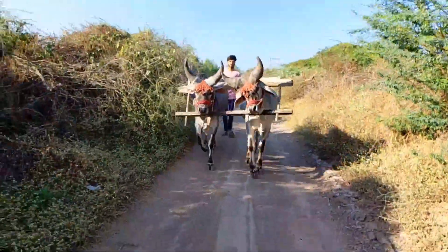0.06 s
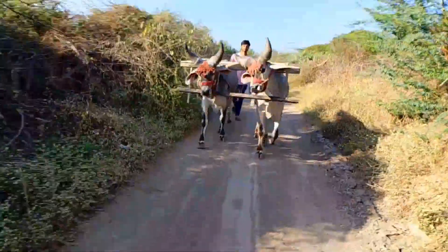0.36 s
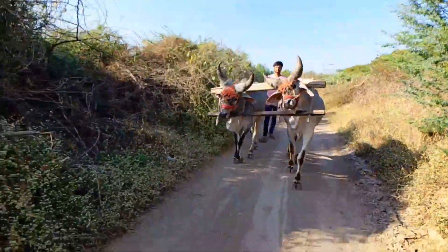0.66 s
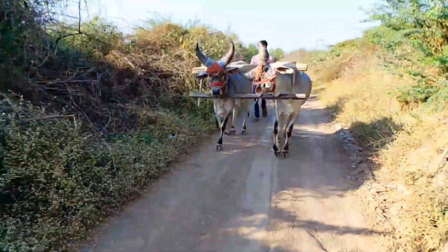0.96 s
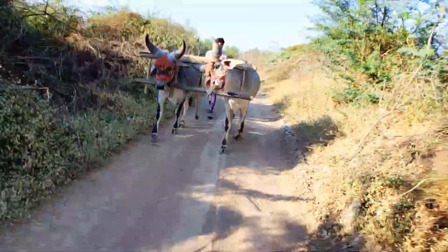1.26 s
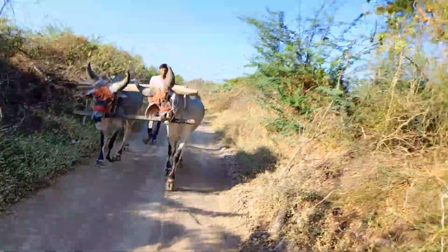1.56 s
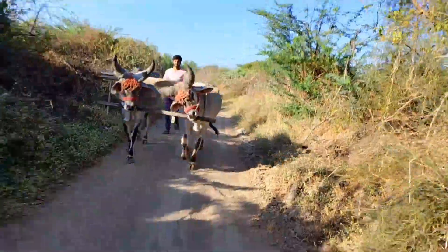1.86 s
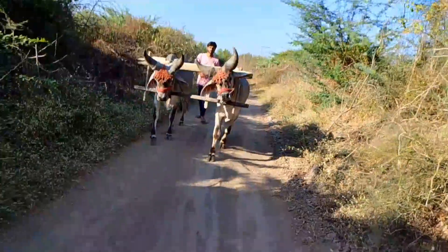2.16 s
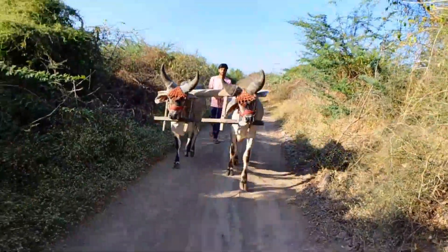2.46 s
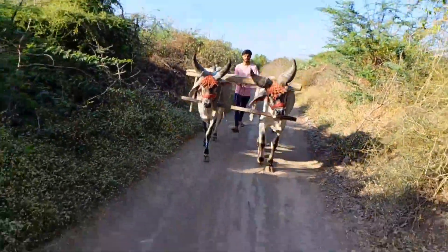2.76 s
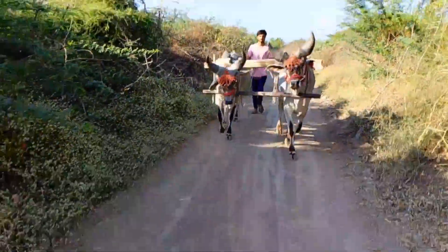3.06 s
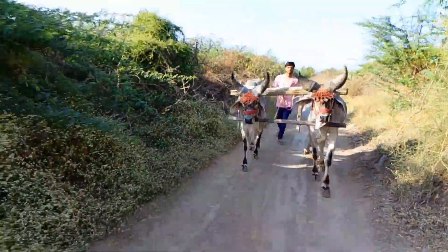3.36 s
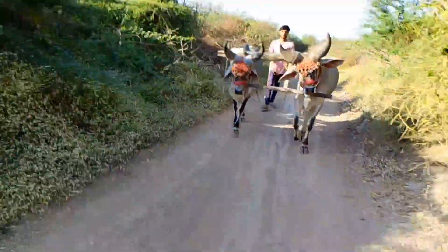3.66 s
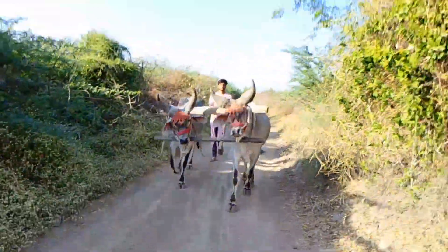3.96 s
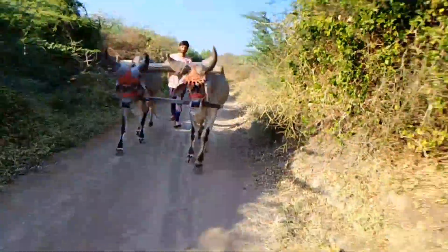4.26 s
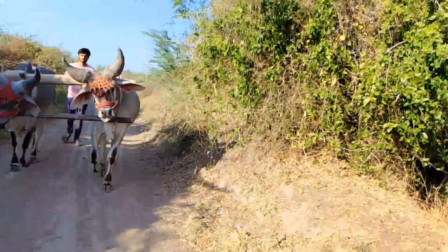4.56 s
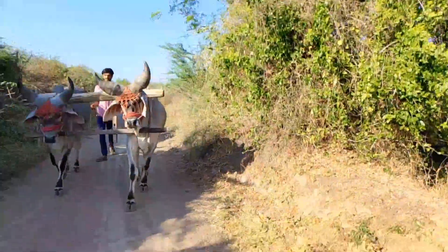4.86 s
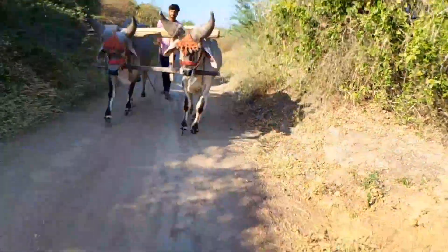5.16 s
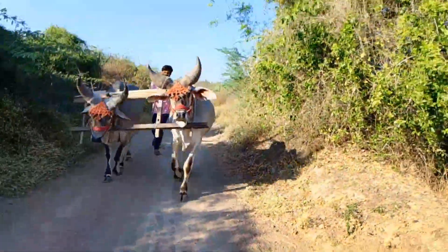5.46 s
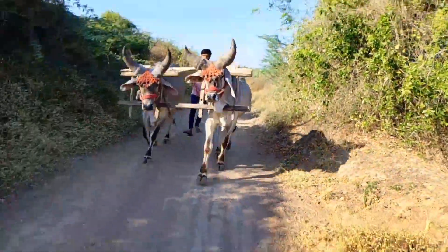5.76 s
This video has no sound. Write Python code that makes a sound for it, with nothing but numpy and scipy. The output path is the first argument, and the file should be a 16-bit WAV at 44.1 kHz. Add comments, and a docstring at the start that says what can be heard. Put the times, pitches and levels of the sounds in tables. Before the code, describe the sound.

Uneven hoof steps crunch and scuff on gritty soil, with small stone cracks, light knocks and a soft outdoor hiss.

```python
"""Two yoked bullocks and their driver on a gravelly dirt track, a few paces in front of the microphone.
From the start a smooth hiss comes and goes over a faint outdoor floor, and light air rumbles on the mic.
Each footfall pushes soil, grinds grit and sprays sand; pebbles tick, stones snap, hoof or yoke knocks.
Near 1.7 s a gust meets the sharpest snap; at 3.5 s several stones give way in a cluster.
The hiss is strongest around 4 s, and the walk goes on in lighter scuffs to the end."""
import sys
import numpy as np
from scipy import signal
from scipy.fft import rfft, irfft
from scipy.io import wavfile

SR = 44100
rng = np.random.default_rng(int(sys.argv[2]) if len(sys.argv) > 2 else 0)


def log_audio(samples):
    """Write samples as a 16-bit WAV file to the path given in sys.argv[1]."""
    # one column per channel
    frames = np.atleast_2d(samples).T
    # limit to full scale, then quantise
    limited = np.clip(frames, -1, 1)
    pcm = np.round(limited * 32767).astype(np.int16)
    wavfile.write(sys.argv[1], SR, pcm)


N = 259749
TIME = np.arange(N) / SR

# swells of the smooth hiss: (start [s], hold [s], level [dB])
HISS_SWELLS = [(0.0, 0.071, -51.5), (1.372, 0.064, -42.5), (2.507, 0.044, -50), (2.841, 0.093, -43.5),
               (3.317, 0.25, -42), (3.781, 0.348, -39)]
# gusts on the microphone: (time [s], level [dB])
GUSTS = [(.32, -64), (1.73, -51.5)]
# a foot drags; sandiness is dull soil below 0, bright sand above:
# (time of hardest push [s], level [dB], swell time [s], sandiness [dB])
SCUFFS = [(0.16, -49, 0.11, 2.5), (0.333, -42, 0.03, 2), (0.59, -52, 0.041, -2), (0.767, -43.5, 0.036, 8),
          (0.809, -39, 0.032, 3.5), (1.216, -49, 0.031, 5.5), (1.264, -47, 0.013, 0.5),
          (1.507, -37.5, 0.016, -3.5), (1.535, -31, .018, 0), (1.729, -45.5, 0.046, 1.5),
          (1.922, -49, 0.057, 1), (2.224, -46.5, 0.018, 4.5), (2.422, -49.5, 0.024, 3.5),
          (2.658, -46.5, 0.043, -0.5), (3.17, -47.5, 0.06, -0.5), (4.5, -54, 0.21, -1),
          (4.68, -46, 0.037, 3.5), (4.756, -48, 0.019, 0.5), (5.02, -53.5, 0.1, 3), (5.098, -41, 0.012, -2),
          (5.208, -51.5, 0.097, 0), (5.462, -51.5, .02, 4), (5.589, -49, .02, -1), (5.693, -47.5, .03, 2),
          (5.784, -50, 0.02, 0)]
# a foot comes down and settles: (time [s], level [dB], settling time [s], sandiness [dB])
LANDINGS = [(0.256, -46, 0.032, 4), (0.524, -43, 0.013, -1.5), (0.987, -53, 0.037, -6),
            (1.103, -40, 0.0045, 3.5), (1.19, -38, 0.024, -1.5), (1.49, -42.5, .015, -0.5),
            (1.649, -41.5, .04, 1.5), (1.768, -44, 0.021, 8), (2.004, -50.5, 0.017, 6.5),
            (2.108, -47, 0.047, 4), (2.139, -41, 0.0075, -10.5), (2.898, -45, 0.018, -1),
            (3.338, -49.5, 0.051, -3.5), (3.524, -41.5, 0.023, 1.5), (3.575, -43, 0.059, 2),
            (3.656, -46.5, .014, 8.5), (3.792, -47.5, 0.0073, -10), (4.099, -44, 0.0091, -8.5),
            (4.121, -40, 0.0055, 1), (4.251, -49.5, 0.026, 1.5), (4.824, -47, 0.053, -0.5),
            (5.33, -48, 0.033, -6), (5.841, -53, 0.052, -1)]
# the loudest stones snapping under a hoof: (time [s], peak [dB], centre [Hz], half width [octaves])
STONE_SNAPS = [(0.104, -25, 3680, 0.5), (0.1858, -20, 7050, 0.67), (0.297, -15, 4830, 0.44),
               (0.316, -18.5, 3960, 0.27), (0.3289, -15.5, 2750, 1.06), (0.4515, -30.5, 3080, 0.7),
               (0.522, -33, 1780, 1.2), (0.5948, -18, 6750, 0.84), (0.8142, -19, 4230, 0.4),
               (1.138, -23.5, 2280, 0.58), (1.1908, -24, 2500, 0.68), (1.222, -19, 2460, 1.3),
               (1.636, -16.5, 4640, 1.2), (1.651, -17.5, 2550, 0.86), (1.6751, -15.5, 2880, 0.94),
               (1.7662, -10.5, 6540, 0.97), (2.137, -22.5, 2880, 0.94), (2.3021, -28.5, 2680, 0.55),
               (2.356, -22, 4470, 1.34), (2.735, -22.5, 2200, 2.5), (2.7593, -28.5, 2670, 0.75),
               (3.107, -27, 2820, 0.42), (3.1358, -32.5, 1470, 0.46), (3.157, -23, 2270, 2.2),
               (3.5321, -11, 3600, .65), (3.5447, -13, 4270, 0.75), (3.5652, -12.5, 2700, 0.83),
               (3.5737, -12.5, 3200, 1.7), (3.5833, -21, 2800, 0.76), (3.6614, -20.5, 5350, 0.34),
               (3.6922, -22, 3120, 0.31), (3.719, -24, 4100, 1), (4.097, -21.5, 1510, 1.1),
               (4.382, -27, 6600, 0.41), (4.4962, -25.5, 6300, 0.18), (4.544, -34, 2280, 1.3),
               (4.5634, -23, 5400, 0.56), (4.723, -24.5, 2620, .4), (4.889, -24.5, 4750, 0.86),
               (4.958, -27.5, 5550, 0.43), (5.1789, -16, 5400, 1.4), (5.2511, -28.5, 1760, 0.88),
               (5.8463, -26, 3900, 0.78)]
# hollow knocks of hoof or yoke: (time [s], relative level [dB], pitch [Hz], t60 [s])
KNOCKS = [(.223, -46, 700, 0.023), (0.254, -38.5, 595, 0.014), (0.331, -40.5, 1675, 0.091),
          (1.156, -44, 692, 0.034), (1.53, -42, 515, 0.047), (1.93, -49.5, 920, 0.032),
          (2.106, -44, 700, 0.023), (4.096, -43, 1340, 0.016), (4.681, -38.5, 1280, 0.014),
          (5.094, -40, 1054, 0.021), (5.31, -46.5, 768, 0.1), (5.665, -50, 2200, 0.027)]
# modes of a knock: (frequency [x pitch], level [dB], decay time [x t60])
KNOCK_MODES = [(0.6, -5, 1.25), (1, 9.5, 0.75), (1.35, -27, 0.74), (1.9, -2.5, 1), (3.5, 0.5, 0.36)]
# spectra of the hiss, the air on the microphone and the ground: (frequency [Hz], density [dB])
HISS_SPECTRUM = [(100, -10.5), (400, -7), (1000, -7.5), (2100, -7.5), (3200, 2), (4200, -3), (6300, -7.5),
                 (7200, 5), (10000, -0.5), (14000, 3)]
RUMBLE_SPECTRUM = [(10, -7), (30, -4), (70, -5), (150, -11), (350, -15), (1000, -21.5), (8000, -91)]
SOIL_SPECTRUM = [(50, -35), (150, -4.5), (270, -7.5), (370, -6.5), (490, -2.5), (720, -1), (1100, -3.5),
                 (1800, -12), (4000, -20), (16000, -20)]
GRIT_SPECTRUM = [(100, -27), (700, -8.5), (1600, 2), (2600, 2.5), (4500, 1.5), (8000, -8), (16000, -46.5)]
SAND_SPECTRUM = [(100, -12.5), (1700, -18.5), (3300, 6.5), (5000, -2), (8000, 1.5), (16000, -2.5)]
# colour of the microphone: (frequency [Hz], gain [dB])
MIC_RESPONSE = [(20, 9), (1500, 1.5), (2800, 2), (3900, -6.5), (4900, -3.5), (6300, -6.5), (7300, -3),
                (8100, 2), (9300, -4.5), (11000, -10.5), (12500, -20.5), (16000, -26)]


def from_db(db):
    """Decibels to gain."""
    return 10 ** (np.asarray(db) / 20)


def rms_one(x):
    """Scale to an rms of one."""
    return x / np.sqrt(np.mean(x ** 2) + 1e-20)


def colour(x, spectrum, size=8192):
    """Causal (minimum-phase) filter that follows a table of (frequency [Hz], gain [dB])."""
    hz, db = np.transpose(spectrum)
    grid = np.maximum(np.fft.rfftfreq(size, 1 / SR), 1)
    gain = from_db(np.interp(np.log(grid), np.log(hz), db))
    cepstrum = irfft(np.log(gain))
    cepstrum[1:size // 2] *= 2
    response = irfft(np.exp(rfft(cepstrum[:size // 2], size)))
    return signal.fftconvolve(x, response)[:N]


def band(x, low_hz, high_hz, order=1):
    """Band-pass."""
    edges = [low_hz, min(high_hz, .45 * SR)]
    return signal.sosfilt(signal.butter(order, edges, "band", fs=SR, output="sos"), x + 1e-18)


def add(track, s, sound):
    """Mix a short sound into the track at time s."""
    start = max(round(s * SR), 0)
    track[start:start + len(sound)] += sound[:N - start]


def swell(start, hold_s, attack_s, release_s):
    """Envelope that grows to one at start, holds and dies away."""
    return np.exp(-np.maximum((start - TIME) / attack_s, (TIME - start - hold_s) / release_s).clip(0, 20))


def flicker(per_s, depth_db, hop=40):
    """Gain that wanders at random, about per_s times a second."""
    pole = np.exp(-2 * np.pi * hop * per_s / SR)
    noise = rng.standard_normal(N // hop + 1002)
    slow = signal.lfilter([1], [1, -2 * pole, pole * pole], noise)[1000:]
    slow = np.interp(np.arange(N) / hop, np.arange(len(slow)), rms_one(slow))
    return from_db(depth_db * slow.clip(-2, 2))


def hiss(rest_db=-49, fade_db_per_s=1.93):
    """A smooth hiss swells a few times above a slowly sinking bed."""
    rest = from_db(rest_db - fade_db_per_s * TIME)
    swell_power = sum((from_db(db) * swell(s, hold_s, attack_s=0.048, release_s=0.028)) ** 2
                      for s, hold_s, db in HISS_SWELLS)
    strength = np.sqrt(rest ** 2 + swell_power) * flicker(per_s=46, depth_db=0.76)
    return strength * rms_one(colour(rng.standard_normal(N), HISS_SPECTRUM))


def breeze(steady_db=-68.5, gust_s=0.039):
    """Light air rumbles on the microphone, with brief gusts."""
    gust_power = sum((from_db(db) * swell(s, 0, gust_s, gust_s)) ** 2 for s, db in GUSTS)
    rumble = flicker(per_s=27, depth_db=3.5) * colour(rng.standard_normal(N), RUMBLE_SPECTRUM)
    return np.sqrt(from_db(steady_db) ** 2 + gust_power) * rms_one(rumble)


def foot_pressures(soil_db=-7.5, sand_db=3, usual_step_db=-45, crush_db_per_db=0.2759):
    """Landings bite and settle, scuffs swell and fade; each is shared among soil, grit and sand."""
    steps = [(db, sandy, swell(s, 0, 0.15 * settle_s, settle_s)) for s, db, settle_s, sandy in LANDINGS]
    steps += [(db, sandy, swell(s, 0, swell_s, 0.99 * swell_s)) for s, db, swell_s, sandy in SCUFFS]
    power = np.zeros((3, N))
    for db, sandy, push in steps:
        grit_db = crush_db_per_db * (db - usual_step_db)  # heavy steps crush disproportionately more
        shares_db = np.array([soil_db - sandy, grit_db, sand_db + sandy])
        power += np.outer(from_db(db + shares_db), push) ** 2
    return np.sqrt(power)


def grains(pressure, spectrum, per_s, spread_db, smooth, clump_db):
    """Tiny uneven fractures over smooth rubbing; a harder push breaks more grains per second."""
    out, edges = 0, np.geomspace(70, 18000, 13)
    chance = (per_s * np.sqrt(pressure / pressure.mean()) + 50) / SR
    for low, high in zip(edges, edges[1:]):
        at = np.flatnonzero(rng.random(N) < chance)
        sizes = from_db(spread_db * np.minimum(rng.exponential(1, N)[at], 3))
        clicks = np.zeros(N)
        rubbing = rng.standard_normal(N)
        # the same energy is shared among more grains when they come faster
        clicks[at] = sizes * np.sign(rubbing[at]) / np.sqrt(chance[at])
        clumps = flicker(per_s=35.3, depth_db=clump_db)  # each pitch range crumbles in its own clumps
        out = out + band((rms_one(clicks) + smooth * rubbing) * clumps, low, high, order=2)
    return pressure * rms_one(colour(rms_one(out), spectrum))


def footfalls(soil, grit, sand):
    """A dull push of soil, crunching grit and a spray of sand; the foot sticks and slips as it grinds."""
    push = grains(soil, SOIL_SPECTRUM, per_s=500, spread_db=4.5, smooth=0.4, clump_db=3.5)
    crunch = grains(grit, GRIT_SPECTRUM, per_s=500, spread_db=7.5, smooth=1.0, clump_db=8.5)
    spray = grains(sand, SAND_SPECTRUM, per_s=1000, spread_db=8.5, smooth=0.95, clump_db=3.5)
    return (push + crunch + spray) * flicker(per_s=45, depth_db=1.2)


def loose_gravel(pressure, per_s=75, size_db=-45, spread_db=4.5, pitches=12):
    """Small pebbles roll and tick at different pitches, oftener and louder while a foot works the ground."""
    out, t = np.zeros(N), TIME[:SR // 100]
    stir = np.sqrt(pressure) / np.mean(np.sqrt(pressure))
    for hz in np.geomspace(2100, 8500, pitches):
        at = np.flatnonzero(rng.random(N) < per_s * stir / (pitches * SR))
        sizes = stir[at] * from_db(size_db + spread_db * np.minimum(rng.exponential(1, N)[at], 2.5))
        tick = band(rng.standard_normal(len(t)) * np.exp(-t / .001), hz / 1.4, hz * 1.4, order=2)
        for s, size in zip(TIME[at], sizes):
            add(out, s, size * tick / np.abs(tick).max())
    return out


def stone_snaps(crumble=0.14, crumble_s=0.0026):
    """A stone gives way with one snap and a moment of crumbling, both in its own pitch range."""
    out, t = np.zeros(N), TIME[:SR // 40]
    for s, peak_db, hz, octaves in STONE_SNAPS:
        force = crumble * rng.standard_normal(len(t)) * np.exp(-t / crumble_s)
        force[0] += 2  # the break itself
        snap = band(force, hz / 2 ** octaves, hz * 2 ** octaves, order=2)
        add(out, s, from_db(peak_db) * snap / np.abs(snap).max())
    return out


def knocks(contact_s=0.00035, grind=0.029, grind_s=0.0085):
    """Blunt blows of hoof or yoke, roughened by grit in the contact, set a few damped modes ringing."""
    out, t = np.zeros(N), TIME[:SR // 4]
    for s, db, hz, t60 in KNOCKS:
        ring = np.zeros(len(t))
        for ratio, mode_db, share in KNOCK_MODES:
            decay = np.exp(-np.log(1000) * t / (t60 * share))
            ring += from_db(mode_db) * decay * np.sin(2 * np.pi * hz * ratio * t)
        force = grind * rng.standard_normal(len(t)) * np.exp(-t / grind_s)
        force[0] += 1  # the blow itself
        rough = signal.fftconvolve(force, ring)[:len(t)] * (1 - np.exp(-t / contact_s))
        add(out, s, from_db(db) * ring.std() * rms_one(rough))
    return out


def banks(x, t60=0.1, build_s=0.00094, scatter_db=-15):
    """The overgrown banks of the track scatter a short, faint, broadband tail back to the microphone."""
    t = TIME[:SR // 3]
    envelope = np.exp(-np.log(1000) * t / t60) * (1 - np.exp(-t / build_s))
    tail = band(rng.standard_normal(len(t)), 134, 13500) * envelope
    return from_db(scatter_db) * signal.fftconvolve(x, tail / np.linalg.norm(tail))[:N]


def scene():
    """The team is a few paces off and straight ahead, so both channels carry the same sound."""
    soil, grit, sand = foot_pressures()
    walk = footfalls(soil, grit, sand) + loose_gravel(grit + sand) + stone_snaps() + knocks()
    air = hiss() + breeze()
    outdoor_floor = from_db(-66.5) * rng.standard_normal(N)
    return np.tile(walk + banks(walk) + air + outdoor_floor, (2, 1))


def record(dry):
    """The microphone lifts the bass and its port colours the treble; the top is cut at 15.9 kHz."""
    heard = np.array([colour(channel, MIC_RESPONSE) for channel in dry])
    return signal.sosfilt(signal.ellip(10, .1, 70, 15900, fs=SR, output="sos"), heard)


dry = scene()
out = record(dry)
log_audio(out)
```